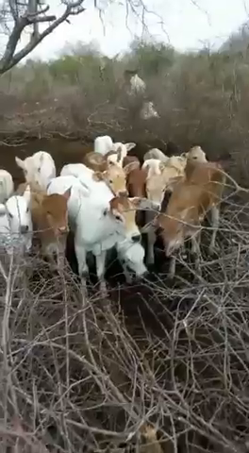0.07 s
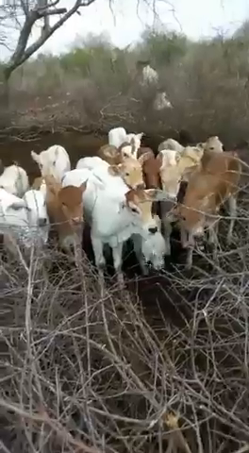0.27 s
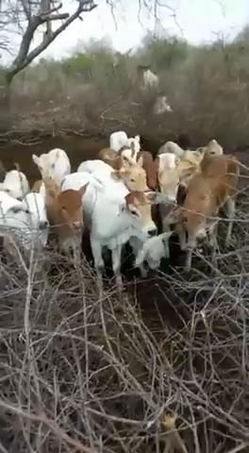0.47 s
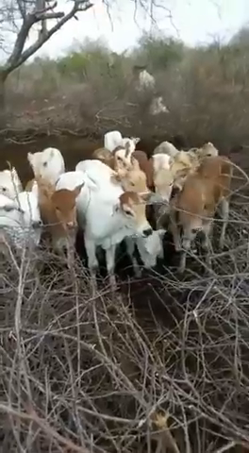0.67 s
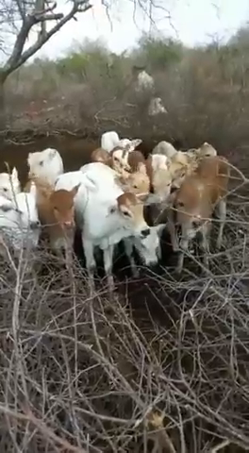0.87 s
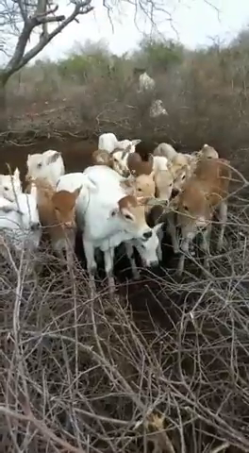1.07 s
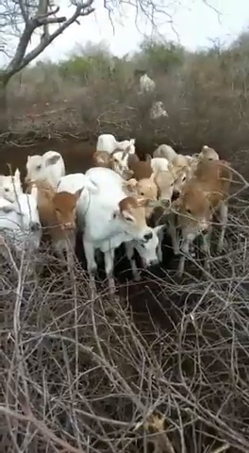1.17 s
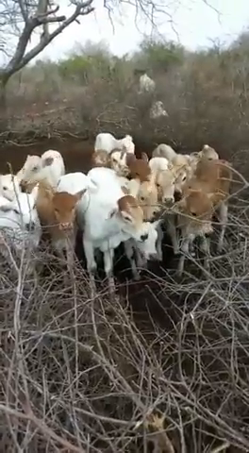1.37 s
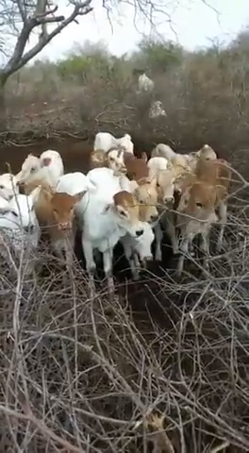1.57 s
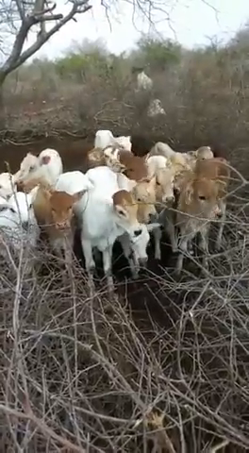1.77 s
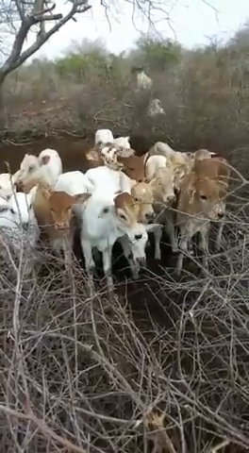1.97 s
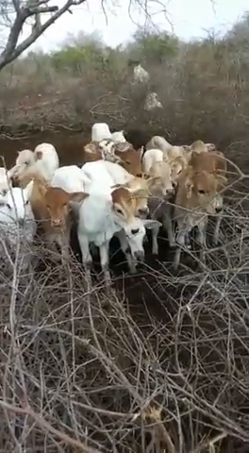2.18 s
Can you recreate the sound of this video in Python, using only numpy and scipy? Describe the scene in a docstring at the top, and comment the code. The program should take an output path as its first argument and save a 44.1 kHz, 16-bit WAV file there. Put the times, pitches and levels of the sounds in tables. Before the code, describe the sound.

One rough calf bawl swells close to the microphone and breaks off with a short scattered outdoor echo; afterwards come twig snaps, a soft hoof thud and a brief rising bird trill, over faint wind, hiss and a far engine.

```python
"""Light wind, hiss and a far single-cylinder engine fade in; the engine speeds up slowly as a cricket trills.
A calf bawls once in a thorn pen: fold pulses and breath through a changing throat filter give a muffled
growl that opens into a clear moo, sags and breaks off. The ground and bushes scatter the sound back.
Dry leaves rustle unevenly; twigs then snap as noise-struck modes under hooves, with one soft thud.
At last a bird starts a rising trill, a gliding sine chopped into ever faster notes."""
import sys
import numpy as np
from scipy import signal
from scipy.fft import rfft, irfft, next_fast_len
from scipy.io import wavfile
from scipy.ndimage import uniform_filter1d, map_coordinates

SR = 44100
rng = np.random.default_rng(int(sys.argv[2]) if len(sys.argv) > 2 else 0)


def ratio(d):
    """dB to gain"""
    e = np.asarray(d, float) / 20
    return 10 ** e


def store_wav(level_fs):
    """Save 16-bit WAV to argv[1]."""
    pcm = np.round(np.clip(np.atleast_2d(level_fs), -1, 1) * 32767)
    wavfile.write(sys.argv[1], SR, pcm.T.astype(np.int16))


N = 98298
T = np.arange(N) / SR


def unit(x):
    """Normalization: scaled to rms 1."""
    return x / np.sqrt(np.mean(x ** 2) + 1e-20)


def steady(x):
    """Level control: the running rms over 2000 samples is held at 1."""
    return x / np.sqrt(np.abs(uniform_filter1d(x ** 2, size=2000)) + 1e-12)


def along(points, hz):
    """Interpolation of (f/Hz, value) points on a logarithmic frequency axis."""
    f, v = np.transpose(points)
    return np.interp(np.log(hz + 1), np.log(f + 1), v)


def curves(rows):
    """Linear interpolation in time: one value per sample for each column after t/s."""
    s, *cols = np.transpose(rows)
    return [np.interp(T, s, c) for c in cols]


def wobble(rate):
    """Slow random modulation: a smooth curve with rate knots a second."""
    return map_coordinates(rng.standard_normal(int(N * rate / SR) + 4), [T * rate])


def filtered(x, response):
    """Linear filtering: the spectrum of x times a complex response of frequency."""
    m = next_fast_len(len(x) + 8192)
    return irfft(rfft(x, m) * response(np.fft.rfftfreq(m, 1 / SR)), m)[:len(x)]


def minimum_phase(db):
    """Minimum phase by the folded cepstrum: a causal response with these levels along the last axis."""
    cepstrum = irfft(np.log(ratio(np.maximum(db, -100))))
    half = cepstrum.shape[-1] // 2
    cepstrum[..., 1:half] *= 2
    cepstrum[..., half + 1:] = 0
    return np.exp(rfft(cepstrum))


def causal(points):
    """Causality: minimum-phase response through (f/Hz, level/dB) points."""
    return lambda hz: minimum_phase(along(points, hz))


def peak(f, hz, width_hz):
    """Damped resonator: the complex response of one causal resonance."""
    return 1j * f * width_hz / (hz * hz - f * f + 1j * f * width_hz)


def pulses(cycles, scatter, scatter_db):
    """Quasi-periodic excitation: a band-limited pulse at each whole cycle, scattered in time and size."""
    k = np.arange(np.ceil(cycles[0]), cycles[-1])
    z = rng.standard_normal((len(k), 2))
    samples = np.arange(N)
    at = np.interp(k, cycles, samples)
    at = np.interp(k + z[:, 0] * np.interp(at, samples, scatter + 0 * T), cycles, samples)
    size = ratio(z[:, 1] * np.interp(at, samples, scatter_db + 0 * T))
    # a windowed sinc places each pulse between samples
    taps = np.floor(at)[:, None] + np.arange(-7, 9)
    d = taps - at[:, None]
    w = np.sinc(d) * np.cos(np.pi * d / 16) ** 2 * size[:, None]
    return np.bincount(np.clip(taps, 0, N - 1).astype(int).ravel(), w.ravel(), N)


# spectrum of wind and hiss: f/Hz, relative level/dB
AIR_COLOUR = [(45, -16.5), (110, -4.5), (230, -18), (350, -26.5), (1000, -36), (2000, -40.5), (5500, -40.5),
              (7500, -46.5), (8500, -55), (13500, -55), (15000, -46)]
AIR_DB = -57  # mean, before the fade-in


def air():
    """Broadband noise: light wind and microphone hiss share one shaped spectrum of wavering level."""
    noise = filtered(rng.standard_normal(N), lambda f: ratio(along(AIR_COLOUR, f)))
    return ratio(AIR_DB + 2.3 * wobble(6.31)) * unit(noise)


# exhaust resonance, passed four times: f/Hz, width of one pass/Hz, gain before levelling/dB
EXHAUST_MODES = [(124.8, 69, 10.5)]
FIRING_HZ, FIRING_GAIN_HZ_PER_S, FIRST_S = 17.7, 2.9, .0985  # rate at t = 0, its growth, a firing time
ENGINE_DB, FIRING_SCATTER_DB = -50, 1.2  # level before the fade-in, size scatter


def engine():
    """Excited resonance: one exhaust thump a firing, dulled by distance, at a steadily growing rate."""
    cycles = FIRING_HZ * (T - FIRST_S) + FIRING_GAIN_HZ_PER_S / 2 * (T ** 2 - FIRST_S ** 2)
    pipe = lambda f: sum(ratio(db) * peak(f, hz, w) ** 4 for hz, w, db in EXHAUST_MODES)
    firings = pulses(cycles, .012, FIRING_SCATTER_DB)  # time scatter in cycles
    return ratio(ENGINE_DB) * unit(filtered(firings, pipe))


# cricket loudness: t/s, mean level/dB
CRICKET_LEVEL = [(.1, -90), (1.3, -77), (2.0, -75.5), (2.02, -80), (2.045, -77), (2.06, -100)]
CRICKET_HZ, CRICKET_WIDTH_HZ = 7240, 50  # carrier and its random frequency deviation
# stroke rate up to CHIRP_AT_S, its growth afterwards, and the time when one stroke peaks
CHIRP_HZ, CHIRP_GAIN_HZ_PER_S, CHIRP_AT_S = 49.2, 9.4, 1.533


def cricket():
    """Amplitude modulation: wing strokes about fifty a second on one high, slightly fuzzy note."""
    u = T - CHIRP_AT_S
    cycles = CHIRP_HZ * u + CHIRP_GAIN_HZ_PER_S / 2 * u * np.maximum(u, 0)
    strokes = np.clip(np.cos(2 * np.pi * cycles) + .3, 0, 1)
    note = np.sin(2 * np.pi * np.cumsum(CRICKET_HZ + CRICKET_WIDTH_HZ * wobble(120)) / SR)
    return ratio(curves(CRICKET_LEVEL)[0] + 1.5 * wobble(30)) * unit(strokes * note)


# bird whistle: t/s, f/Hz, amplitude level/dB
WHISTLE = [(2.11, 1490, -70), (2.16, 1600, -53.5), (2.18, 1780, -57), (2.198, 2180, -56),
           (2.212, 2253, -51.5), (2.229, 2697, -68)]
TRILL_HZ, TRILL_GAIN_HZ_PER_S, TRILL_FIRST_S = 52.4, 620, 2.118  # note rate at first peak, growth, its time


def bird():
    """Combined frequency and amplitude modulation: a rising whistle chopped into ever faster notes."""
    hz, db = curves(WHISTLE)
    u = T - TRILL_FIRST_S
    cycles = TRILL_HZ * u + TRILL_GAIN_HZ_PER_S / 2 * u * np.abs(u)
    notes = np.clip(np.cos(2 * np.pi * cycles) + .4 + 6 * u, 0, 1)  # the gaps fill in with time
    return ratio(db) * notes * np.sin(2 * np.pi * np.cumsum(hz) / SR) * (T > WHISTLE[0][0])


# decay time of bushes and ground: f/Hz, t60/s
ECHO_T60 = [(600, 0.35), (1300, 0.36), (8000, 0.37)]
ECHO_DB = -21.5


def echo(x):
    """Diffuse reflection: a short scattered answer from the bushes, decaying by frequency."""
    hz, t, z = signal.stft(rng.standard_normal(SR // 2), SR, nperseg=256)
    decay = ratio(-60 * t / along(ECHO_T60, hz)[:, None])
    tail = signal.istft(z * decay, SR, nperseg=256)[1]
    delayed = np.pad(x, (500, 0))  # samples
    return ratio(ECHO_DB) * signal.fftconvolve(delayed, tail / np.linalg.norm(tail))[:N]


GROUND_DB, GROUND_T60_S, GROUND_HZ = -3, .04, 2500  # tail gain, decay time, high-pass corner


def ground(x):
    """Early scattering: the treble comes again at once off the ground and the other animals."""
    t = np.arange(SR // 20) / SR
    tail = rng.standard_normal(len(t)) * ratio(-60 * t / GROUND_T60_S)
    high = filtered(x, lambda f: (1j * f / (GROUND_HZ + 1j * f)) ** 2)
    return ratio(GROUND_DB) * signal.fftconvolve(high, tail / np.linalg.norm(tail))[:N]


# rustle loudness: t/s, level/dB
RUSTLE_LEVEL = [(.085, -75.5), (.2, -68.5), (.4, -65.5), (1.45, -70.5), (1.55, -105), (1.85, -102),
                (1.9, -68), (2.05, -108), (2.075, -71), (2.15, -71)]
# spectrum of dry leaves: f/Hz, relative level/dB
LEAF_COLOUR = [(1800, -21.5), (2450, 3.5), (2900, -2.5), (5100, -2), (6300, -9), (8000, -38.5)]


def leaves():
    """Modulated noise: the uneven rustle of dry leaves."""
    grains = rng.standard_normal(N) * ratio(3 * wobble(150) + 1.5 * wobble(20))
    rustle = filtered(grains, lambda f: ratio(along(LEAF_COLOUR, f)))
    return ratio(curves(RUSTLE_LEVEL)[0]) * unit(rustle)


# twigs breaking: t/s, peak level/dB, favoured f/Hz, gain of crack against ring/dB
TWIG_SNAPS = [(1.397, -45, 5600, -4), (1.4003, -32.5, 5600, -5), (1.4048, -29, 5560, 1),
              (1.4079, -27.5, 3867, 4.5), (1.415, -41, 4000, -13), (1.489, -50.5, 3340, -22),
              (1.858, -47.5, 3296, -25.5), (1.873, -25.5, 3660, -47), (1.881, -42, 3500, -44),
              (2.065, -53.5, 3360, -32), (2.071, -49.5, 4150, -3), (2.079, -53, 3300, -30),
              (2.086, -55, 3250, -26), (2.133, -34, 5200, -22)]
# spectrum of the crack: f/Hz, relative level/dB
CRACK_COLOUR = [(2400, -43), (3000, 3), (7500, -3.5), (11800, -22.5), (12500, -42)]
# modes of the twigs: f/Hz, gain before the fall-off/dB
RING_MODES = [(2200, 2.5), (3000, 3), (3350, 1.5), (4100, -3), (5000, 11), (5400, -0.5), (6100, -23),
              (8400, 9)]
TWIG_WIDTH_HZ = 323  # of one pass; each mode is passed twice
SNAP_T60_S, FALL_DB_PER_OCTAVE = 0.0068, 29  # burst decay; modes weaken away from the favoured frequency
# hoof on soft ground: t/s, envelope peak level/dB, f/Hz
HOOF_THUDS = [(1.629, -40, 109.4)]


def hooves():
    """Impulsive excitation: twigs crack and ring in modes near where they break; a hoof thuds."""
    out, t = np.zeros(N + 4000), np.arange(4000) / SR
    for s, db, hz, crack_db in TWIG_SNAPS:
        burst = rng.standard_normal(len(t)) * ratio(-60 * t / SNAP_T60_S) * (1 - np.exp(-t / 0.00023))
        modes = [(c, g - FALL_DB_PER_OCTAVE * abs(np.log2(c / hz))) for c, g in RING_MODES]
        ring = lambda f: sum(ratio(g) * peak(f, c, TWIG_WIDTH_HZ) ** 2 for c, g in modes)
        snap = filtered(burst, lambda f: ratio(crack_db) * causal(CRACK_COLOUR)(f) + ring(f))
        out[round(s * SR):][:len(t)] += ratio(db) * snap / np.abs(snap).max()
    for s, db, hz in HOOF_THUDS:
        envelope = (t / 0.012 * np.exp(1 - t / 0.012)) ** 2  # peaks at 12 ms
        out[round(s * SR):][:len(t)] += ratio(db) * np.sin(2 * np.pi * hz * t) * envelope
    return out[:N]


# mouth: t/s, shape (0 shut, 1 opening, 2 open, 3 wide, 4 closing), lowering of the upper resonances f/Hz
MOUTH_SHAPE = [(.43, 0, 38), (.475, 0.6, 126), (.54, 1, 14), (.61, 2, 1), (.95, 2.5, 13.5), (1.15, 3, -2),
               (1.26, 3, -10), (1.3, 4, -15)]
# throat with the mouth shut: f/Hz, relative level/dB
SHUT_COLOUR = [(230, -19.5), (470, 3), (560, 7.5), (690, -9.5), (860, 0.5), (1260, 0.5), (1600, -19.5),
               (1900, -36), (2400, -45), (3200, -28), (3600, -18.5), (4000, -30), (4500, -18.5),
               (5350, -25), (6100, -73), (7400, -33.5), (9000, -80)]
# throat with the mouth open: f/Hz, relative level/dB
OPEN_COLOUR = [(140, -57), (250, -26), (370, -7), (497, 2.5), (620, -15.5), (745, -17.5), (870, -12.5),
               (1020, -21.5), (1180, -13), (1250, -1), (1370, -10.5), (1540, -28), (1860, -8.5),
               (1990, -29), (2230, -12), (2710, -26.5), (3100, -13), (3410, -35.5), (3800, -10),
               (4050, -22.5), (4300, -12), (4500, -26.5), (4950, -14.5), (5700, -41), (6200, -34.5),
               (7300, -48), (8300, -44.5), (9600, -57.5), (10900, -45.5), (12000, -100)]
# added to the open throat while the mouth opens: f/Hz, level/dB
OPENING_CHANGE = [(450, -3.5), (650, -4.5), (1100, 2.5), (1400, -5), (2000, -2.5), (2400, 4), (3100, 4),
                  (3800, -3), (4250, 7.5), (4900, -1), (7000, -1.5)]
# added to the open throat as the mouth goes wide: f/Hz, level/dB
WIDE_CHANGE = [(350, -2.5), (600, 2), (1250, 2), (2300, 2), (3000, -4.5), (4500, 0.5), (9000, -6)]
CLOSING_HZ, CLOSING_WIDTH_HZ = 610, 110  # hollow ring of the closing mouth
DRIFT_DB = 2.2  # rms in the treble: the throat never holds quite still


def throat(source):
    """Time-varying filter: frame by frame the throat glides between mouth shapes and drifts at random."""
    hop, m = 256, 4096
    starts = np.arange(0, N - 2 * hop, hop)
    mouth, lowered_hz = (c[starts + hop, None] for c in curves(MOUTH_SHAPE))
    f = np.fft.rfftfreq(m, 1 / SR)
    hz = f + lowered_hz * np.tanh(f / 1000)  # the bass resonances move less
    shut, wide_open = along(SHUT_COLOUR, hz), along(OPEN_COLOUR, hz)
    opening = wide_open + along(OPENING_CHANGE, hz)
    wide = wide_open + along(WIDE_CHANGE, hz)
    hollow = 20 * np.log10(np.abs(peak(hz, CLOSING_HZ, CLOSING_WIDTH_HZ)) + 1e-4)
    shapes = [shut, opening, wide_open, wide, shut + hollow]
    db = sum(np.clip(1 - np.abs(mouth - k), 0, 1) * shape for k, shape in enumerate(shapes))
    # random drift, smooth over frequency and time
    field = uniform_filter1d(rng.standard_normal(db.shape), size=14, axis=1)
    field = uniform_filter1d(field, size=24, axis=0)
    db = db + DRIFT_DB * unit(field) * np.tanh(f / 2500)
    frames = source[starts[:, None] + np.arange(2 * hop)] * signal.get_window("hann", 2 * hop)
    rung = irfft(rfft(frames, m) * minimum_phase(db), m)
    return np.bincount((starts[:, None] + np.arange(m)).ravel(), rung.ravel(), N + m)[:N]


# the moo: t/s, pitch f/Hz, level/dB
MOO_LINE = [(.155, 86.78, -75), (.19, 86.57, -58.5), (.23, 86.9, -53.5), (.328, 89.93, -46.5),
            (.386, 94.9, -44), (.43, 98.8, -48), (.47, 110.6, -42.5), (.5, 113.2, -35.5),
            (.546, 120.6, -30.5), (.75, 123, -28), (.908, 124.7, -24), (1.072, 123.2, -23.5),
            (1.146, 119.3, -25), (1.188, 116.5, -26.5), (1.212, 109.8, -25), (1.234, 102.9, -25),
            (1.257, 90.25, -29), (1.275, 81.8, -35), (1.295, 73.1, -47), (1.385, 63.97, -65.5)]
# roughness: t/s, share of breath noise (0 to 1)
BREATH_SHARE = [(.15, .22), (.45, .1), (.52, .02), (1.265, .025), (1.3, .6)]
JITTER, SHIMMER_DB = 0.008, 2  # scatter of pulse time (cycles) and size at full roughness
GATE, HISS_HZ = 2.895, 3000  # sharpness of breath puffs; above HISS_HZ breath is brighter than the pulses


def calf():
    """Source-filter principle: vocal-fold pulses and puffs of breath excite a throat led by the mouth."""
    hz, db = curves(MOO_LINE)
    rough, = curves(BREATH_SHARE)
    cycles = np.cumsum(hz) / SR
    puffs = unit(np.exp(GATE * np.cos(2 * np.pi * cycles)) * rng.standard_normal(N))
    puffs = filtered(puffs, lambda f: 1 + (f / HISS_HZ) ** 2)
    folds = unit(pulses(cycles, JITTER * np.sqrt(rough), SHIMMER_DB * np.sqrt(rough)))
    source = folds * np.sqrt(1 - rough ** 2) + rough * puffs
    sounding = (T > MOO_LINE[0][0]) * (T < MOO_LINE[-1][0])
    return steady(throat(source)) * ratio(db) * sounding


# fade-in of engine and air; its first time ends the opening silence: t/s, gain level/dB
FADE = [(.083, -12), (.2, -1.5), (.35, 1)]


def scene():
    """Superposition: near sounds with their reflections, then the distant ones, in mono."""
    voice = calf()
    near = voice + ground(voice) + hooves()
    animals = near + echo(near) + leaves() + bird() + cricket()
    background = ratio(curves(FADE)[0]) * (engine() + air())
    return (animals + background)[None]


def roll_off(x):
    """The treble ends steeply here."""
    return signal.sosfilt(signal.butter(12, 15690, fs=SR, output="sos"), x)


def record(dry):
    """Gating: the scene starts after a short silence."""
    mix = dry * (T > FADE[0][0])
    return roll_off(mix)


dry = scene()
out = record(dry)
store_wav(out)
```